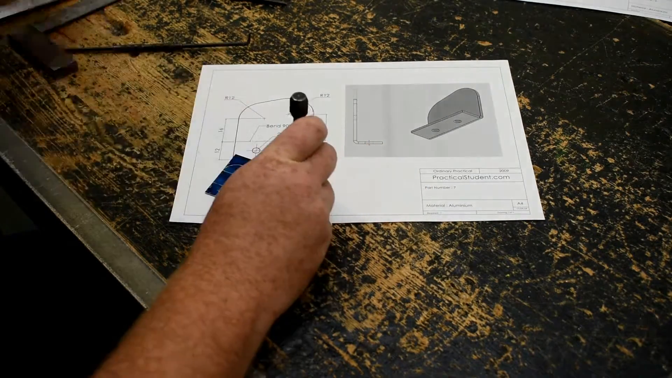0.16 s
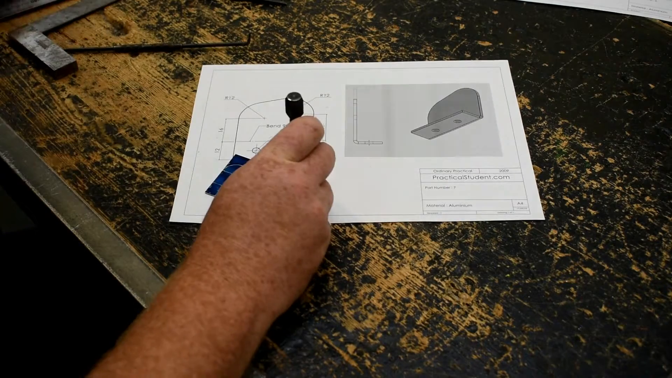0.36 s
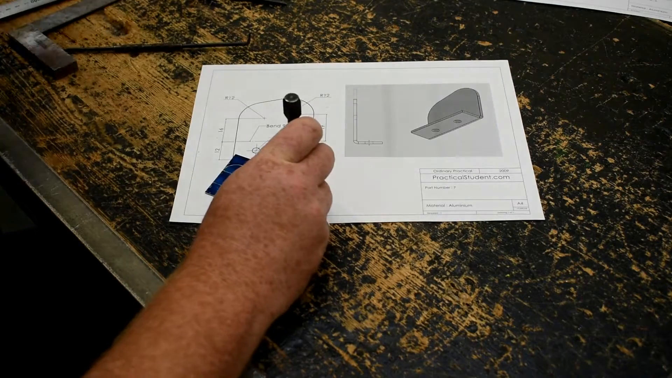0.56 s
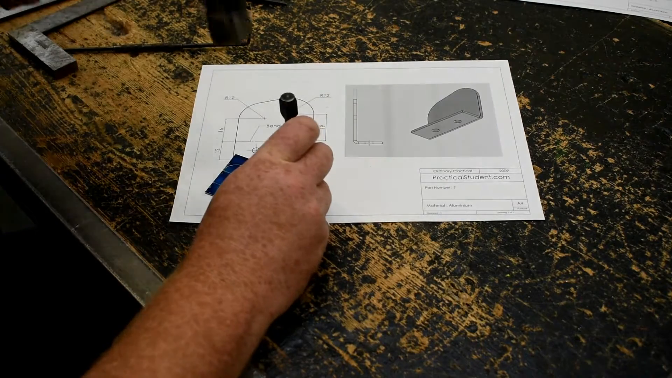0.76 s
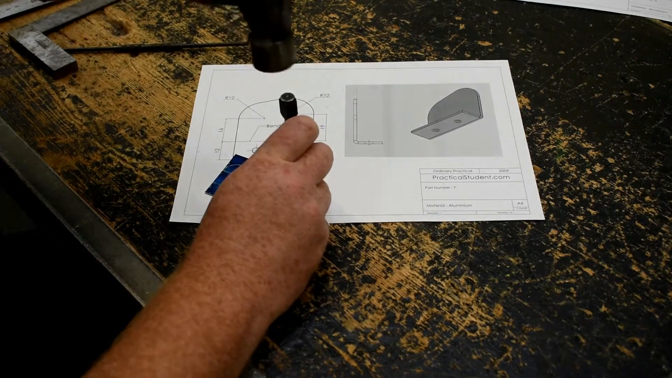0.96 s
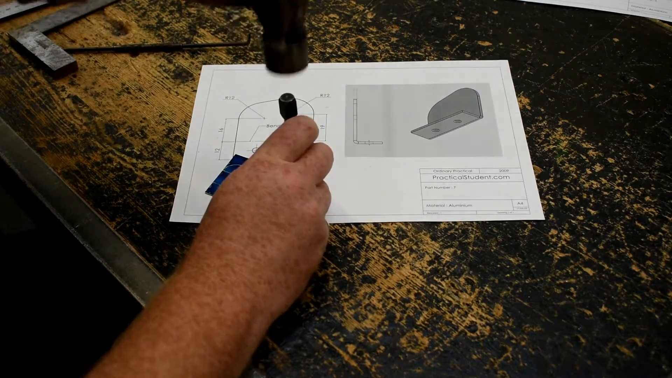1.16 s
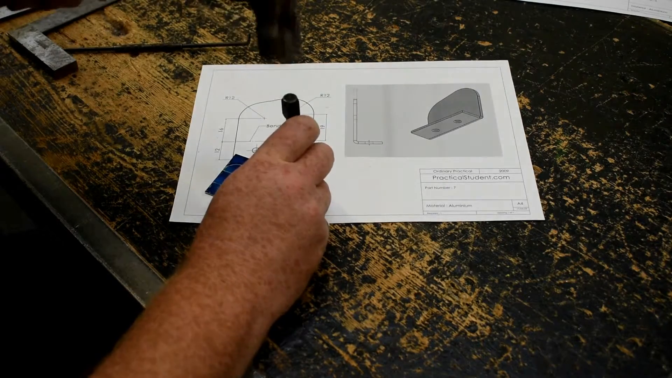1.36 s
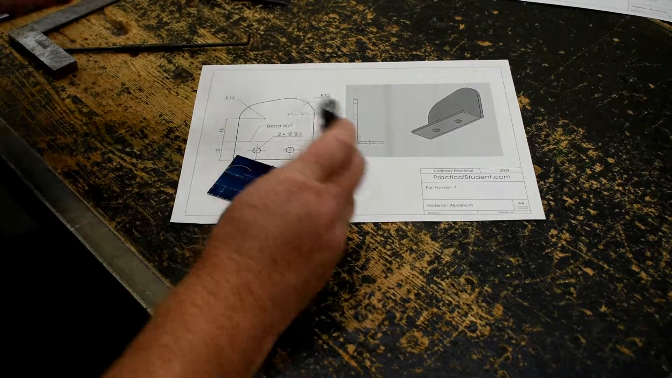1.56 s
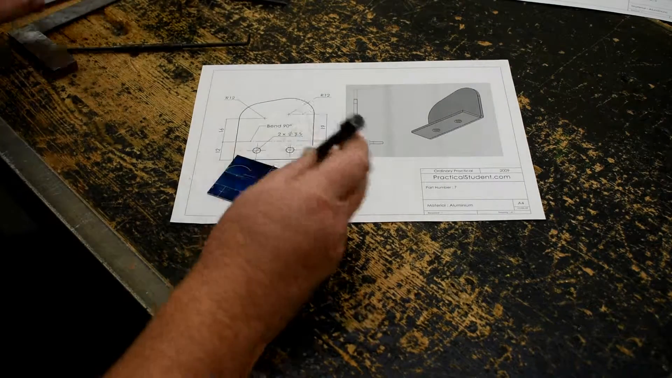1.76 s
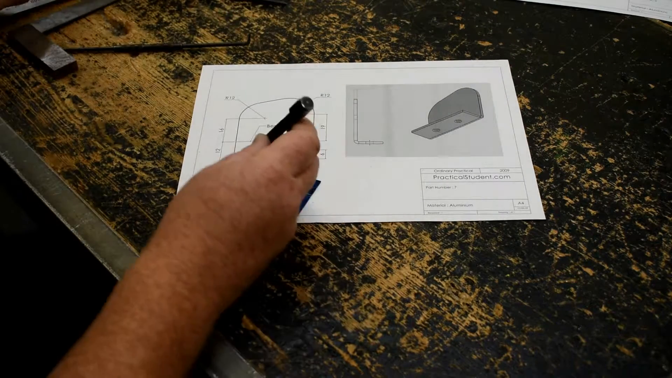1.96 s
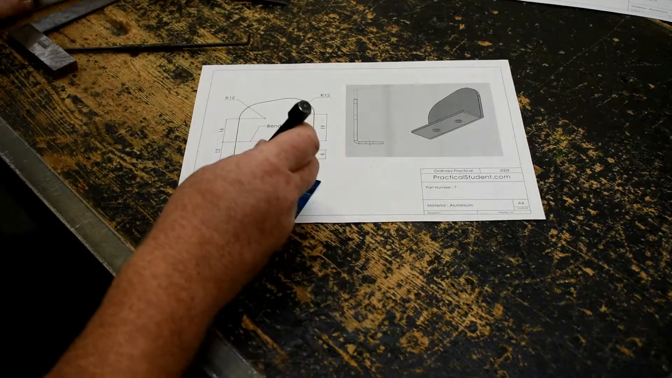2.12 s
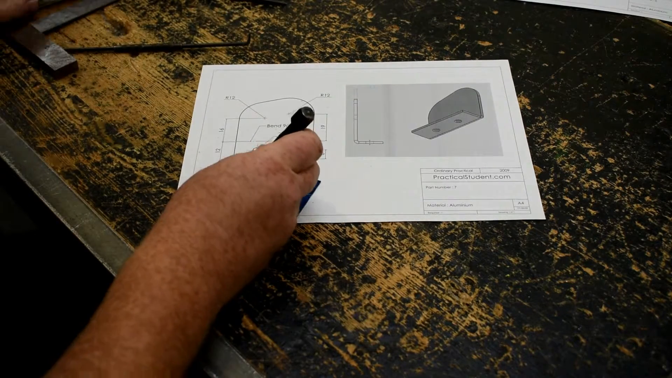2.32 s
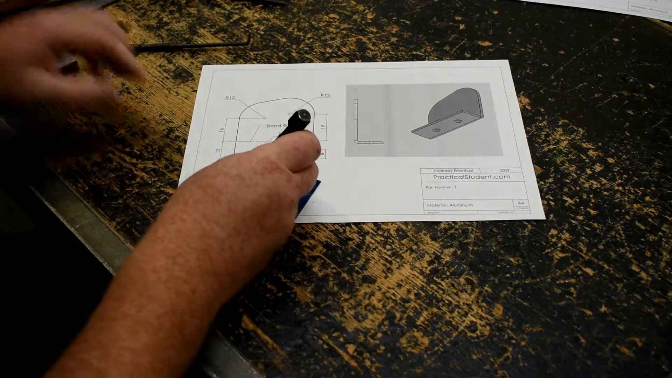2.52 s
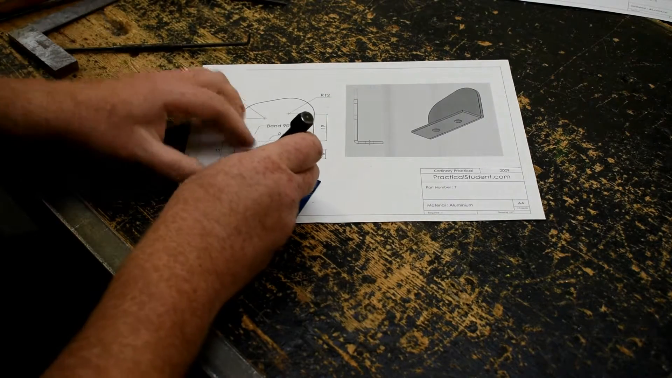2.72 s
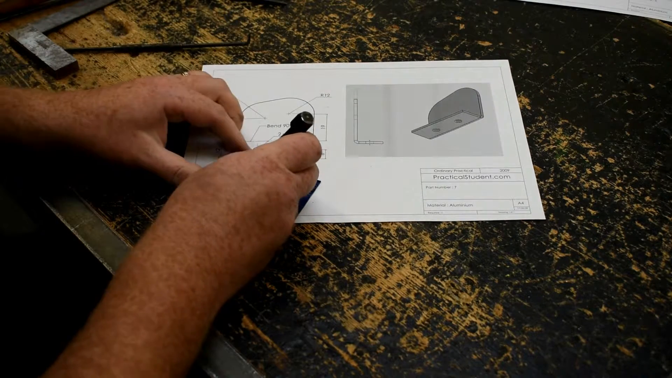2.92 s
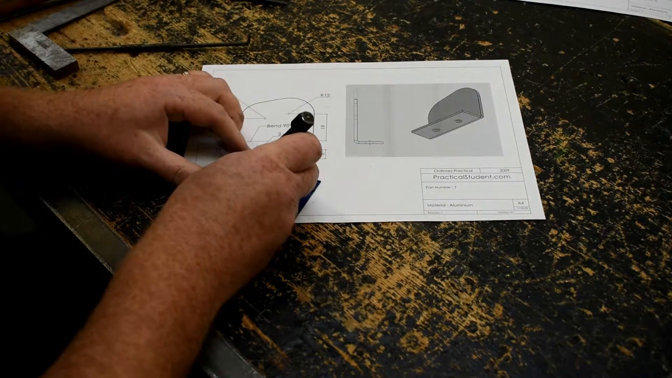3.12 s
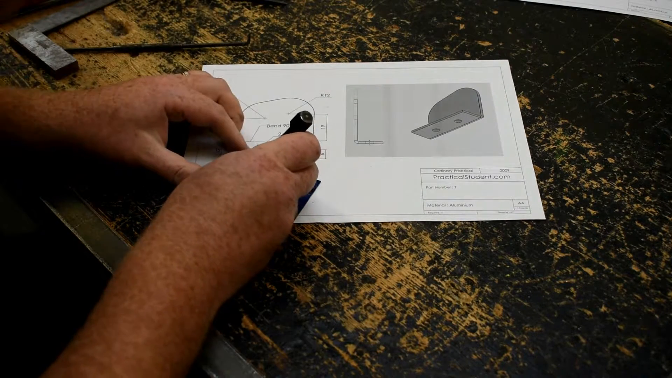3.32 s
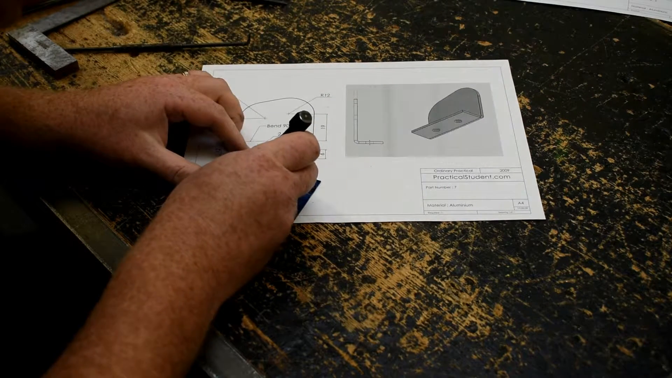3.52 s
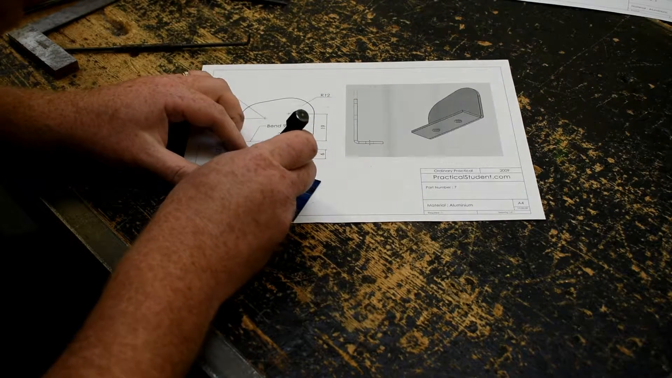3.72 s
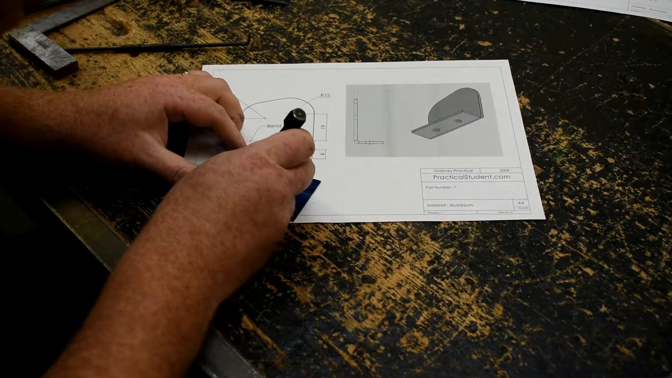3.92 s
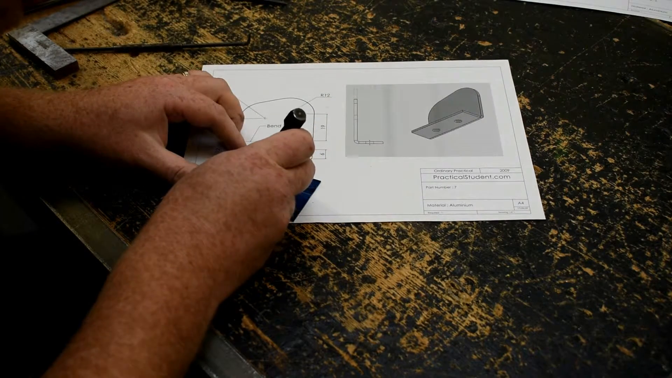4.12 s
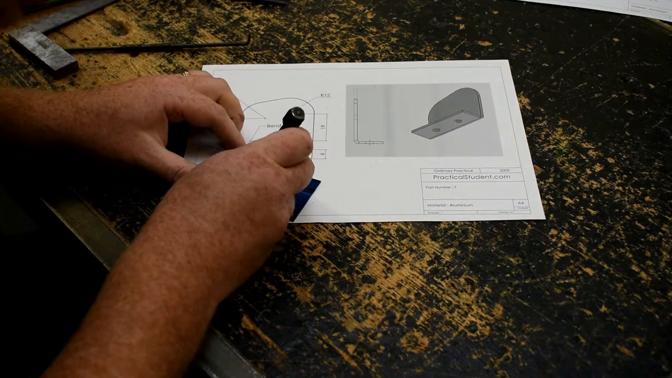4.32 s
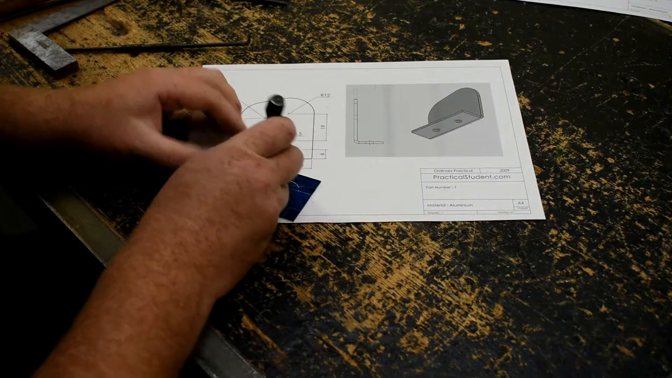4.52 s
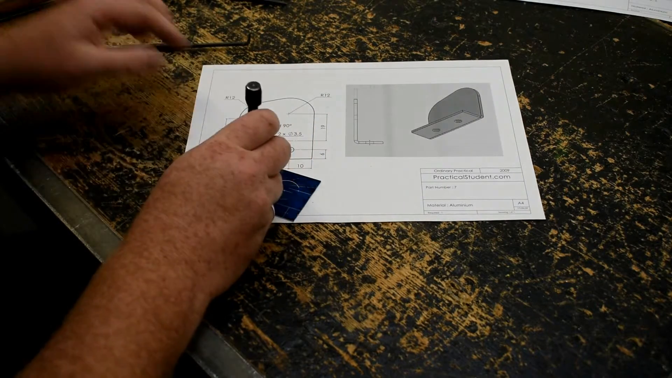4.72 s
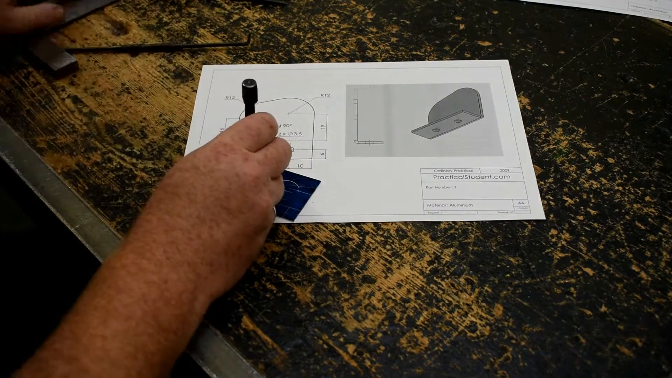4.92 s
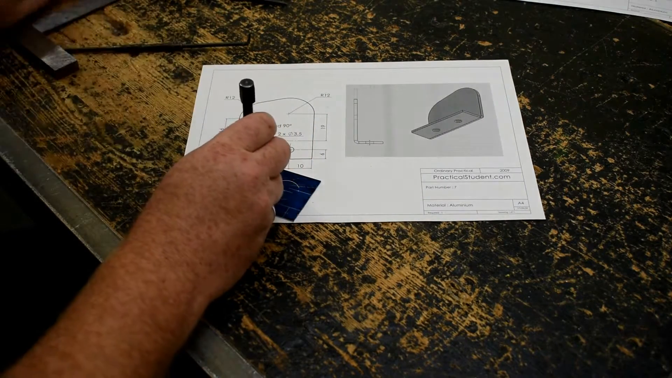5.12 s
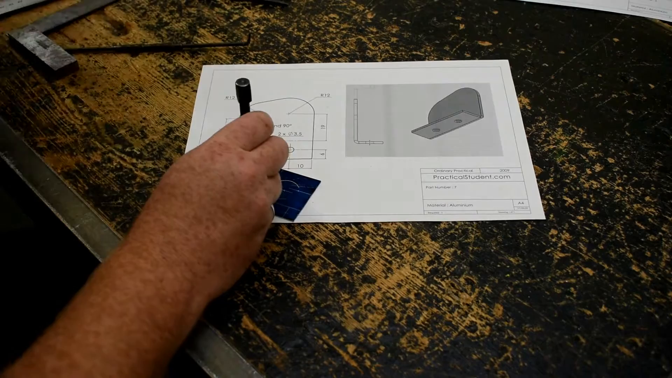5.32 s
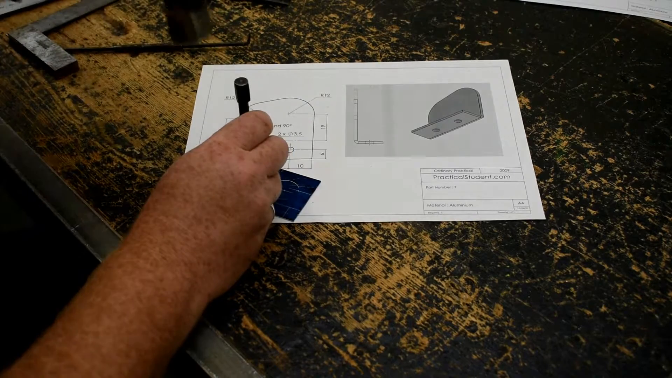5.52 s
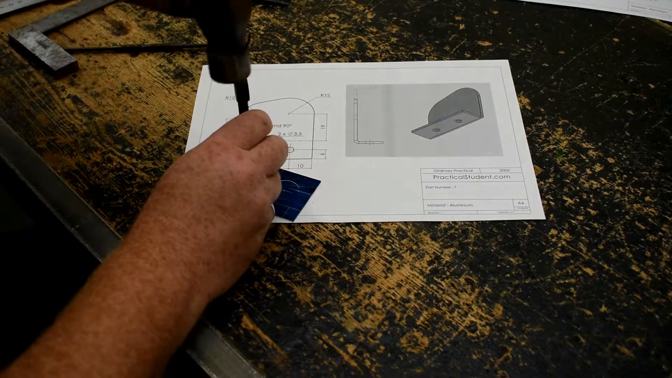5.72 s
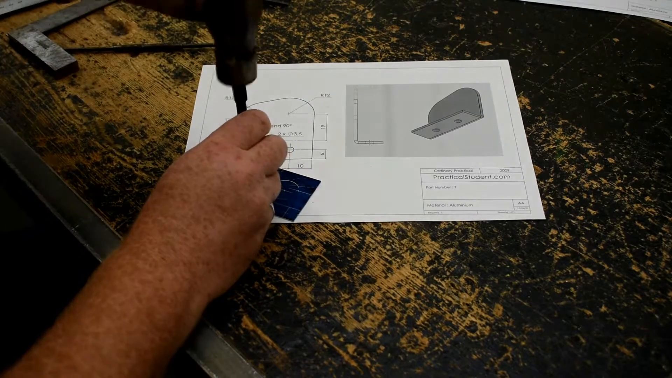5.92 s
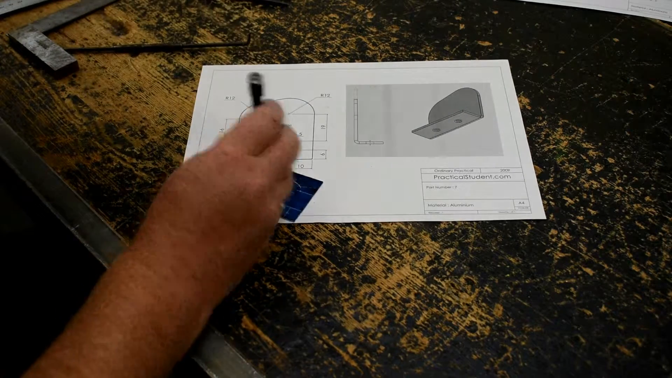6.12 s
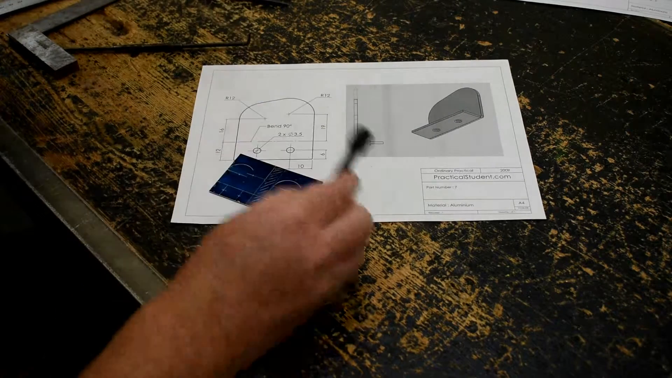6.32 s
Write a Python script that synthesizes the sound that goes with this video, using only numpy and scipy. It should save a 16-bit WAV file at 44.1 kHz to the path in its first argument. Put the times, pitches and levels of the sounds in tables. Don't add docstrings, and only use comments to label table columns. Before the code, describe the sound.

In a large hard-walled workshop, a hammer cracks sharply onto a metal punch, and the wooden bench booms with a long tail. Soon the hammer is laid among steel tools with scrapes, raps and bright rings. After a quiet gap with faint hum and ventilation, it is picked up with a small clatter and strikes a second time. Close microphone, the blows overloading slightly.

```python
import sys
import numpy as np
from scipy import signal
from scipy.fft import rfft, irfft
from scipy.io import wavfile
from scipy.ndimage import uniform_filter1d

SR = 44100
rng = np.random.default_rng(int(sys.argv[2]) if len(sys.argv) > 2 else 0)


def gain_from_decibels(decibels):
    exponent = np.asarray(decibels, float) / 20
    return 10 ** exponent


def materialize(psi):
    bounded = np.clip(np.atleast_2d(psi).T, -1, 1)
    quanta = np.round(bounded * 32767).astype(np.int16)
    wavfile.write(sys.argv[1], SR, quanta)


N = 280646


def read(table, hz):
    f, v = np.transpose(table)
    return np.interp(np.log(np.maximum(hz, 1)), np.log(f), v)


def unit(x):
    return x / np.sqrt(np.sum(x ** 2))


def response(table, size=4096):
    hz = np.arange(size // 2 + 1) * SR / size
    log_gain = read(table, hz) * np.log(10) / 20
    cepstrum = irfft(log_gain)
    cepstrum[1:size // 2] *= 2
    cepstrum[size // 2 + 1:] = 0
    return unit(irfft(np.exp(rfft(cepstrum))))


def ring(hz, t60, rise=0.):
    t = np.arange(int(min(t60, 1.5) * SR)) / SR
    decay = 1000 ** (-t / t60)
    return np.sin(2 * np.pi * hz * t) * decay * (1 - np.exp(-t / (rise + 1e-6)))


def add(track, s, x):
    i = int(s * SR)
    track[i:i + len(x)] += x[:N - i]


def walk(rate_hz):
    k = int(SR / rate_hz)
    steps = np.repeat(rng.standard_normal(N // k + 1), k)
    return 1.3 * uniform_filter1d(uniform_filter1d(steps, k), k)[:N]


def noise(gain_db, size):
    hz = np.arange(size // 2 + 1) * SR / size
    return irfft(rfft(rng.standard_normal(size)) * gain_from_decibels(gain_db(hz)), size)


def stereo(mid, side):
    return np.array([mid + side, mid - side])


def ventilation():
    # frequency in Hz, level in dB per Hz
    air_colour = [(15, -46), (25, -26.5), (45, -7.5), (70, -11.5), (130, -4.5), (170, -23.5), (190, -8.5),
                  (301, -3), (330, -11), (560, -10.5), (818, -12.5), (1700, -21), (8600, -32), (16000, -37)]
    # frequency in Hz, side minus mid in dB
    air_width = [(60, -19.5), (110, -14.5), (200, -18), (380, -13.5), (700, -11), (1290, -7), (2380, -2.5),
                 (4400, -0.5), (8120, 1.5), (15000, 2)]
    mid = noise(lambda hz: read(air_colour, hz), N)
    side = noise(lambda hz: read(air_colour, hz) + read(air_width, hz), N)
    level_db = -55.5 + 0.2 * walk(1.1)
    return gain_from_decibels(level_db) / np.std(mid) * stereo(mid, side)


def hum(t):
    # frequency in Hz, level in dB
    hum_lines = [(70.0, -69), (118.4, -79.5), (199.2, -75.5), (274.5, -70), (301.5, -62), (500.6, -65),
                 (576.0, -63), (818.3, -69.5)]
    return sum(gain_from_decibels(db + 1.5 + 2 * walk(4.09)) * np.sin(2 * np.pi * hz * t + 1.64 * walk(1))
               for hz, db in hum_lines)


def engine(t):
    # time in seconds, firing rate in Hz, level in dB
    engine_course = [(0, 76.7, -51), (.45, 82.7, -52.5), (.8, 90, -61), (1., 92.7, -52), (1.25, 96.3, -58)]
    s, hz, db = np.transpose(engine_course)
    phase = 2 * np.pi * np.cumsum(np.interp(t, s, hz)) / SR
    level_db = np.interp(t, s, db) - 12 * np.maximum(t - s[-1], 0)
    return gain_from_decibels(level_db - 3 + 2 * walk(3)) * (np.sin(phase) + gain_from_decibels(-8.5) * np.sin(2 * phase))


def whine(t):
    pulse_levels_db = [-4.5, -1.5, -7, -11.5]
    tone_hz, pulse_hz, level_db = 10140, 66.7, -64.5
    beat = pulse_hz * t + 0.28 * walk(2)
    pulse_db = np.array(pulse_levels_db)[np.floor(beat).astype(int) % 4] + 2 * walk(20)
    pulse = abs(np.sin(np.pi * beat)) * gain_from_decibels(pulse_db)
    return gain_from_decibels(level_db) * pulse * np.sin(2 * np.pi * tone_hz * t + 1.5 * walk(11))


def strokes(t):
    # time of the peak in seconds, hold in seconds, level in dB
    hand_strokes = [(0.0, .02, -65.5), (0.31, 0.034, -66.5), (.365, .03, -62.5), (.43, .02, -65.5),
                    (0.497, 0.03, -67), (0.615, 0.033, -66.5), (4.645, 0.029, -64.5), (5.02, .04, -65.5),
                    (5.085, .02, -55)]
    attack_db_s, release_db_s, resting_db = 400, 150, -77.5
    db = [top_db - attack_db_s * np.maximum(s - t, 0) - release_db_s * np.maximum(t - s - hold, 0)
          for s, hold, top_db in hand_strokes]
    return gain_from_decibels(np.maximum(np.max(db, axis=0), resting_db))


def rubbing(t):
    # frequency in Hz, level in dB per Hz
    rub_colour = [(300, -14), (1000, -1.5), (3500, 2), (6000, -11), (9000, 1.5), (12000, -3.5),
                  (16000, -20.5)]
    rub = np.array([noise(lambda hz: read(rub_colour, hz), N) for _ in range(2)])
    rub *= strokes(t) * gain_from_decibels(6.5 + 2 * walk(60))
    return stereo(rub[0], gain_from_decibels(-11.5) * rub[1])


def background():
    t = np.arange(N) / SR
    return ventilation() + hum(t) + engine(t) + whine(t) + rubbing(t)


def room(wet):
    # frequency in Hz, t60 in seconds
    room_t60 = [(60, 1.3), (250, 0.96), (700, 0.95), (1400, 1.183), (3000, 1), (5500, 0.87), (8000, 0.62),
                (11000, 0.49), (16000, 0.1)]
    # frequency in Hz, side minus mid in dB
    room_width = [(60, -35.5), (300, -31), (1000, -22.5), (2500, -16.5), (5000, -11), (12000, -4.5)]
    # delay in seconds, spread in seconds, gain over the diffuse tail
    reflections = [(0.0156, 0.0024, 0.62), (.035, 0.0019, 1.), (0.048, 0.0017, 0.99),
                   (0.057, 0.00074, 0.61), (.078, .004, .4), (0.204, 0.0017, 0.13), (.35, 0.01, 0.13)]
    rise_s, early_share, lumps_db = 0.048, 0.5, 1.5
    size = int(1.6 * SR)
    t, mid, side = np.arange(size) / SR, 0, 0
    spectra = rfft(rng.standard_normal((2, size)))
    octave = np.log2(np.maximum(np.arange(size // 2 + 1) * SR / size, 1))
    for hz in 30 * 2 ** np.arange(0, 9.6, .5):
        decay = 1000 ** (-t / read(room_t60, hz)) * gain_from_decibels(lumps_db * walk(60)[:size])
        band = np.maximum(1 - 2 * abs(octave - np.log2(hz)), 0)
        band_mid, band_side = irfft(spectra * band, size) * decay
        mid = mid + band_mid
        side = side + gain_from_decibels(read(room_width, hz)) * band_side
    fill = 1 - (1 - early_share) * np.exp(-(t / rise_s) ** 2)
    fill += sum(gain * np.exp(-((t - delay) / spread) ** 2) for delay, spread, gain in reflections)
    return np.array([signal.fftconvolve(wet, fill * tail)[:N] for tail in stereo(mid, side)])


def scrapes(dry, wet):
    # start in seconds, fade in seconds, level in dB, room tail in dB
    laid_down = [
        (2.151, 0.023, -15, -20.5),
        (2.17, 0.015, -17.5, -42),
    ]
    rattling = [(2.27, 0.0027, -40, -24.5), (2.276, 0.0016, -19, -27), (2.306, 0.0035, -24, -28),
                (2.3435, 0.0074, -19.5, -19.5), (2.376, 0.0076, -12.5, -22), (2.386, 0.11, -16, -21),
                (2.452, 0.01, -28, -19.5), (2.484, 0.013, -15, -34)]
    picked_up = [
        (.502, 0.0014, -48, -64),
        (5.088, 0.018, -44, -34),
        (5.12, 0.021, -25, -32),
        (5.1667, 0.0007, -15, -40),
    ]
    # frequency in Hz, level in dB per Hz
    contact_colours = [
        [(290, -30), (500, -39), (660, -12.5), (1130, -9), (1840, -10), (2430, -15.5), (2690, -13), (3820, -14), (5930, -9.5), (7600, -12.5), (10000, -7.5), (15300, -17), (16500, -44)],
        [(290, -30), (500, -1.5), (799, -18), (885, -12.5), (966, -6), (1220, -12.5), (1330, -17), (1660, -14), (2430, -14), (2770, -18), (6010, -16), (7820, -16.5), (9190, -9), (15300, -20.5), (16500, -49.5)],
        [(290, -43.5), (500, -6.5), (546, -3), (623, -14.5), (670, -13), (1040, -10), (1150, -14.5), (1870, -15), (2320, -18.5), (5510, -19), (7170, -23.5), (9600, -18), (16500, -33)],
    ]
    grit_db, swell_share, swell_max_s = 3, 0.31, .008
    t = np.arange(4000) / SR
    for contacts, colour in zip((laid_down, rattling, picked_up), contact_colours):
        for s, fade, db, tail_db in contacts:
            swell = min(swell_share * fade, swell_max_s)
            shape = np.where(t < swell, 0.27 + 0.3 * t / swell, np.exp(-(t - swell) / fade))
            grit = rng.standard_normal(len(t)) * gain_from_decibels(grit_db * (rng.exponential(size=len(t)) - 2.0))
            scrape = signal.fftconvolve(shape * grit, response(colour))
            add(dry, s, gain_from_decibels(db) * scrape)
            add(wet, s, gain_from_decibels(tail_db) * unit(scrape))


def tool_rings(dry, wet):
    # frequency in Hz, level in dB, t60 in seconds
    short_tool = [(9320, -12, .045), (13300, -17, .045), (11320, -17, .2), (8260, -22, .05),
                  (12400, -20, .05), (6970, -25, .04)]
    long_tool = [(8800, -15, .18), (9600, -14.5, 0.19), (10950, -17.5, 0.13), (9640, -24, .12),
                 (8700, -20, .15), (10900, -30, .08)]
    hammer_face = [(9580, -19.5, 0.017), (12100, -16, .004), (14900, -23, .004), (7600, -36, 0.078),
                   (8850, -32.5, 0.11)]
    # time in seconds, level in dB
    tool_strikes = [
        [(2.306, -20), (2.344, 1.5), (2.378, -4)],
        [(2.393, -4), (2.457, -5.5)],
        [(5.167, 2)],
    ]
    # time in seconds, frequency in Hz, level in dB, t60 in seconds
    stray_rings = [(2.276, 4500, -32, .15), (5.012, 11200, -61, .2), (5.02, 9200, -60, .15),
                   (5.1, 7500, -48, 0.14), (5.126, 9600, -35, .06), (5.198, 5630, -40, .03)]
    struck = []
    for modes, hits in zip((short_tool, long_tool, hammer_face), tool_strikes):
        for s, hit_db in hits:
            for hz, db, t60 in modes:
                struck.append((s, hz, db + hit_db + 1.2 * rng.standard_normal(), t60))
    for s, hz, db, t60 in struck + stray_rings:
        pair = ring(hz, t60, rise=0.00017) + .5 * ring(1.006 * hz, t60, rise=0.00033)
        add(dry, s, gain_from_decibels(db) * pair)
        add(wet, s, gain_from_decibels(db - 43) * pair)


def knock(dry, wet, s, db, hz, t60, body, tail_db):
    room_bass_hz, tilt_db_oct = 129.4, -2.5
    add(dry, s, -gain_from_decibels(db) * body)
    add(dry, s, -gain_from_decibels(db - 7.0) * ring(1.9 * hz, 0.35 * t60, rise=0.18 / hz))
    room_gain = gain_from_decibels(db + tail_db + tilt_db_oct * np.log2(hz / 500)) * min(hz / room_bass_hz, 1) ** 2
    add(wet, s, room_gain * unit(np.diff(ring(hz, 0.012, rise=0.00067))))


def thuds(dry, wet):
    # time in seconds, peak in dB, frequency in Hz
    loose_thuds = [(.474, -38.5, 374.6), (5.124, -28, 1819), (1.61, -34.5, 416), (2.165, -14, 395),
                   (2.163, -26, 247.6), (2.165, -26, 92), (2.183, -21, 678), (2.308, -23.5, 305),
                   (2.312, -24.5, 92), (2.38, -21, 325), (2.372, -29.5, 96.5), (2.389, -16.5, 1300),
                   (2.44, -13.5, 527), (2.5, -25, 265.4), (2.549, -41, 81), (2.77, -50, 72),
                   (5.097, -29, 1276), (5.11, -34, 247.3), (6.289, -30, 387.5)]
    cycles, min_s, rise_cycles = 44, .07, 0.59
    for s, db, hz in loose_thuds:
        t60 = max(cycles / hz, min_s)
        knock(dry, wet, s, db, hz, t60, ring(hz, t60, rise=rise_cycles / hz), tail_db=-11)


def raps(dry, wet):
    # time in seconds, peak in dB, frequency in Hz
    dry_raps = [(2.3833, -.5, 750), (2.4268, -3.5, 650), (5.0985, -16, 900), (5.1075, -18, 620),
                (2.487, -15.5, 514)]
    no_bass = signal.butter(2, 250, "high", fs=SR, output="sos")
    for s, db, hz in dry_raps:
        t60 = 13 / hz
        body = signal.sosfilt(no_bass, ring(hz, t60, rise=.14 / hz))
        knock(dry, wet, s, db, hz, t60, body, tail_db=-26)


def blows(dry, wet):
    # start in seconds, crack in dB, head ring in Hz, steel part to the room in dB, bench in dB
    punch_blows = [
        (1.2724, 0, 9810, -16, 4.5),
        (5.9655, -1, 9210, -14.5, 5.5),
    ]
    # frequency in Hz, level in dB, t60 in seconds
    bench_modes = [(92, -25.5, 0.6), (159.6, -28.5, 0.27), (203, -33, 0.83), (248, -36.5, 1),
                   (306.7, -18.5, 0.28), (279.4, -30, 0.9), (392, -17.5, .3), (423, -32, 0.98),
                   (533, -30, 0.619), (771, -29, 0.7), (853, -33.5, 0.93), (930, -25.5, 0.21),
                   (1300, -35.5, 0.93), (1590, -39.5, 1)]
    # frequency in Hz, level in dB per Hz
    steel_colours = [
        [(290, -36.5), (500, -3), (668, -7), (729, -6), (855, -4), (1160, -12.5), (1260, -13.5), (3750, -16), (5700, -13), (6510, -23), (9220, -14), (11100, -14.5), (14500, -41.5), (15300, -50), (16000, -99)],
        [(290, -33.5), (500, 5), (649, -18), (855, -4.5), (1190, -15.5), (1600, -13), (2160, -21.5), (5020, -18), (5630, -15), (6610, -22), (9490, -14), (10200, -27), (11100, -20.5), (15100, -39), (16000, -78)],
    ]
    # frequency in Hz, level in dB per Hz
    boom_colour = [(25, -36.5), (45, -5.5), (60, -31.5), (90, -4.5), (200, -4.5), (400, 3.5), (600, -1.5),
                   (1200, -43)]
    bench_rise_s, head_over_crack_db, boom_over_steel_db = 0.018, 15, -2.1
    for (s, crack_db, head_hz, steel_db, bench_db), colour in zip(punch_blows, steel_colours):
        head_db, wood_db = crack_db + head_over_crack_db, steel_db + boom_over_steel_db
        bite, face = s + .00033, s + .0005
        add(dry, s, gain_from_decibels(crack_db - 13) * ring(5200, .003))
        add(dry, bite, -gain_from_decibels(crack_db) * ring(2600, .0022))
        add(dry, bite, -gain_from_decibels(crack_db + 3.5) * ring(910, 0.0019))
        add(dry, face, gain_from_decibels(crack_db - 8.5) * ring(3600, 0.0068))
        add(dry, face, gain_from_decibels(head_db) * ring(head_hz, .0042, rise=.0012))
        add(dry, s + 0.00061, gain_from_decibels(head_db - 18.0) * ring(1.2 * head_hz, 0.0068, rise=0.00017))
        add(dry, face, gain_from_decibels(head_db - 10.5) * ring(0.63 * head_hz, 0.0014))
        add(dry, face, gain_from_decibels(head_db - 21.5) * ring(1.4 * head_hz, .003))
        add(dry, s + 0.0076, gain_from_decibels(head_db - 39.0) * ring(1.02 * head_hz, 0.046, rise=.001))
        for hz, db, t60 in bench_modes:
            mode_db = db + bench_db + 1.2 * rng.standard_normal()
            add(dry, s, gain_from_decibels(mode_db) * ring(hz, t60, bench_rise_s))
        add(wet, s, gain_from_decibels(steel_db) * response(colour))
        add(wet, s, gain_from_decibels(wood_db) * response(boom_colour))


def scene():
    dry, wet = np.zeros(N), np.zeros(N)
    for source in (scrapes, tool_rings, thuds, raps, blows):
        source(dry, wet)
    lean = 0.26 * np.gradient(dry)
    return stereo(dry, lean) + room(wet) + background()


def roll_off(x):
    return signal.sosfilt(signal.butter(12, 16990, fs=SR, output="sos"), x)


def record(dry):
    dry = signal.sosfilt(signal.butter(2, 45, "high", fs=SR, output="sos"), dry)
    dry = signal.sosfilt(signal.ellip(10, .2, 65, 15850, fs=SR, output="sos"), dry)
    return roll_off(np.clip(dry, -.91, .91))


dry = scene()
out = record(dry)
materialize(out)
```